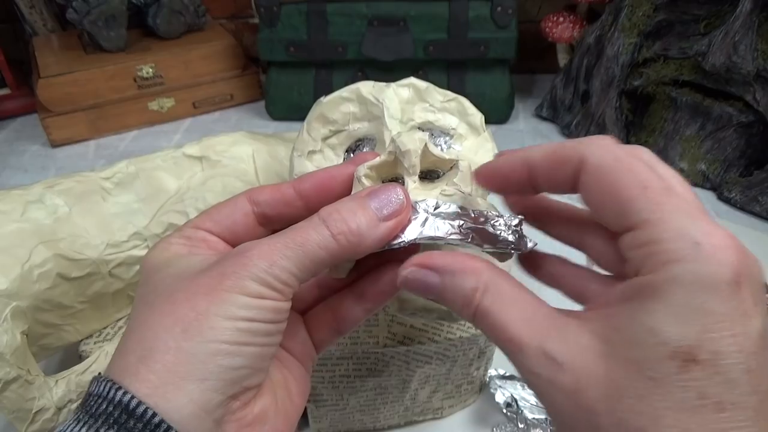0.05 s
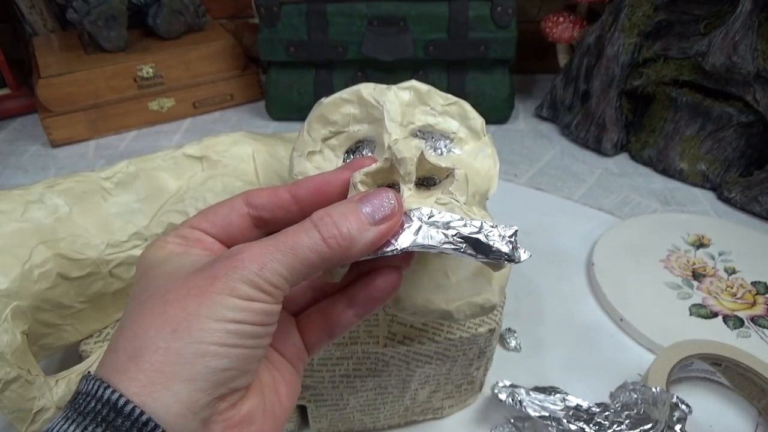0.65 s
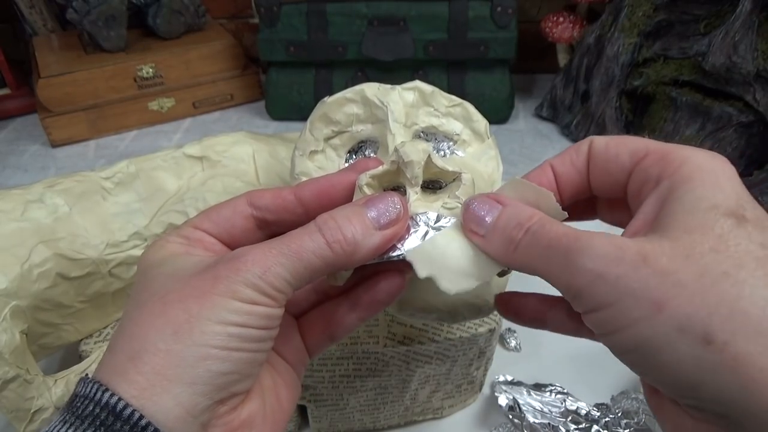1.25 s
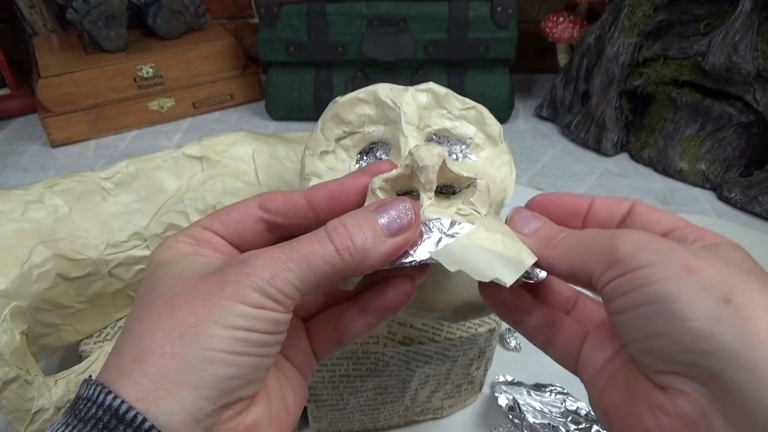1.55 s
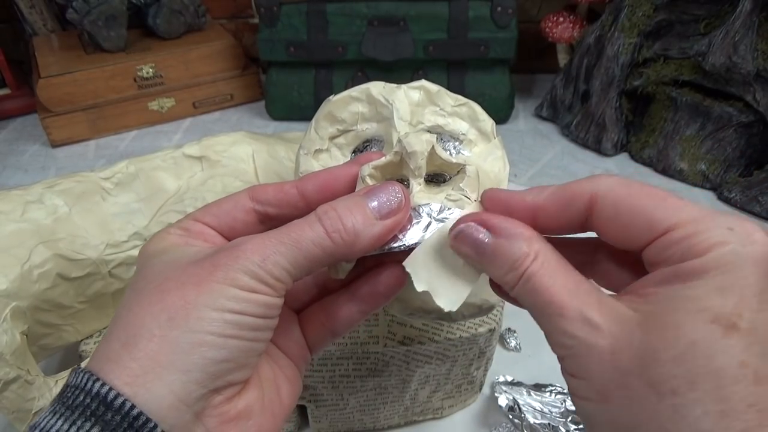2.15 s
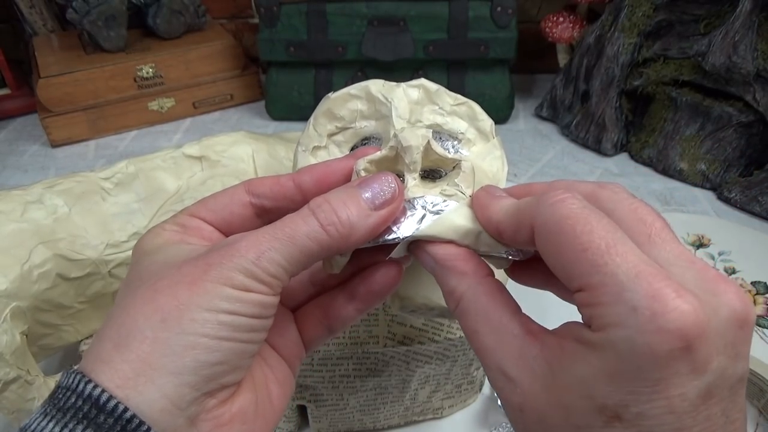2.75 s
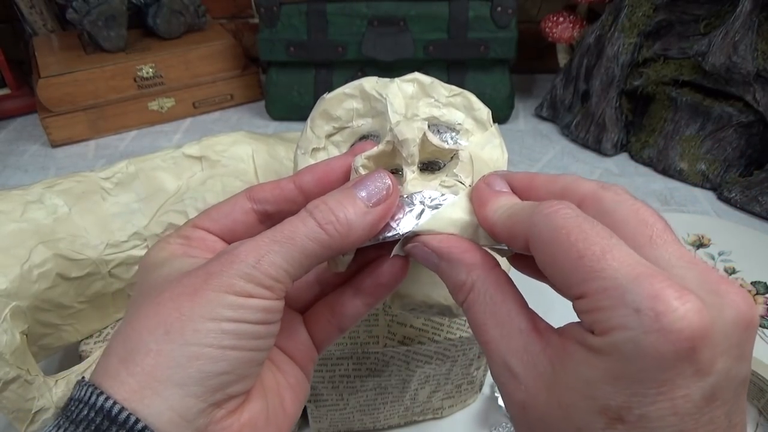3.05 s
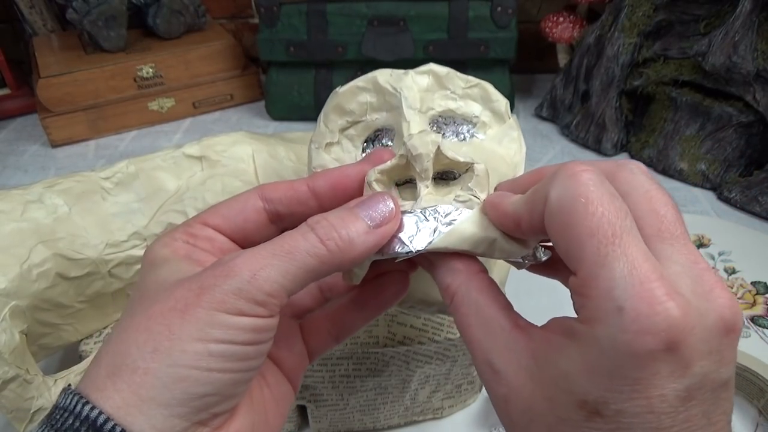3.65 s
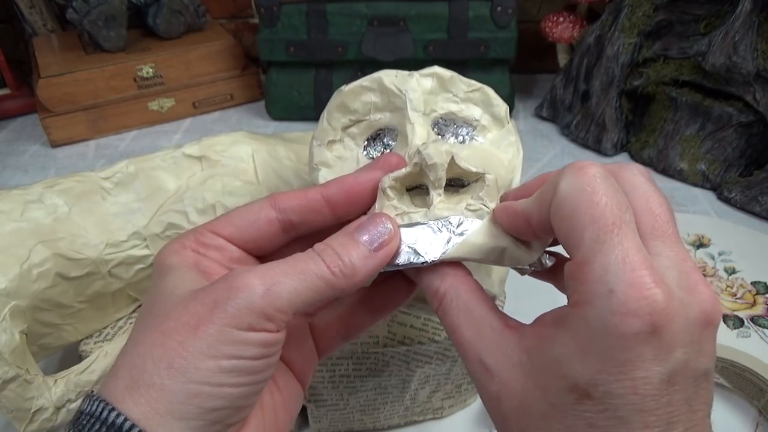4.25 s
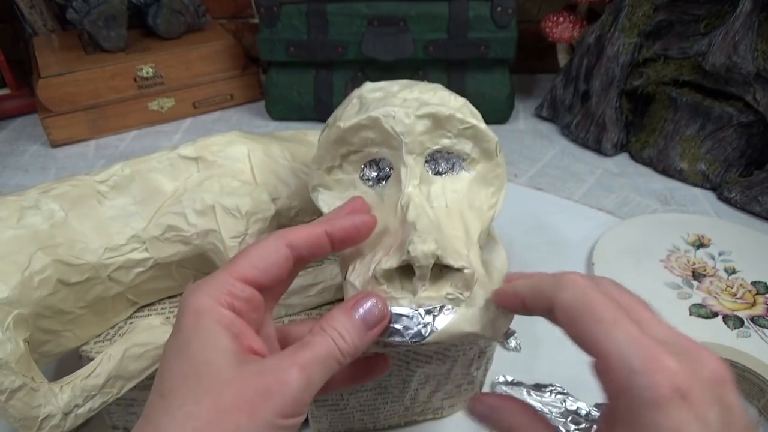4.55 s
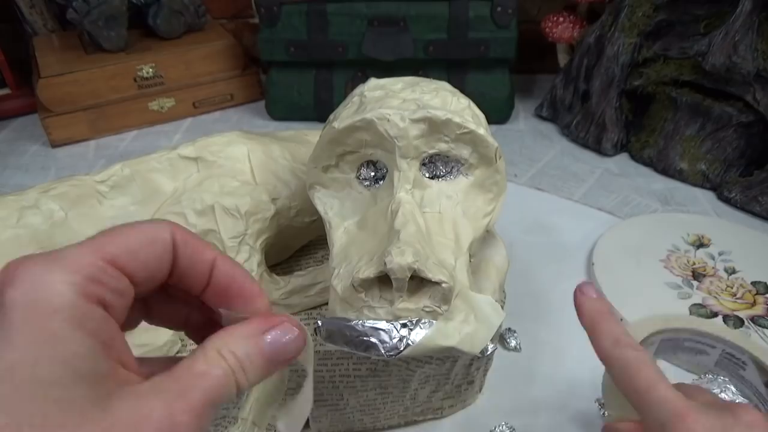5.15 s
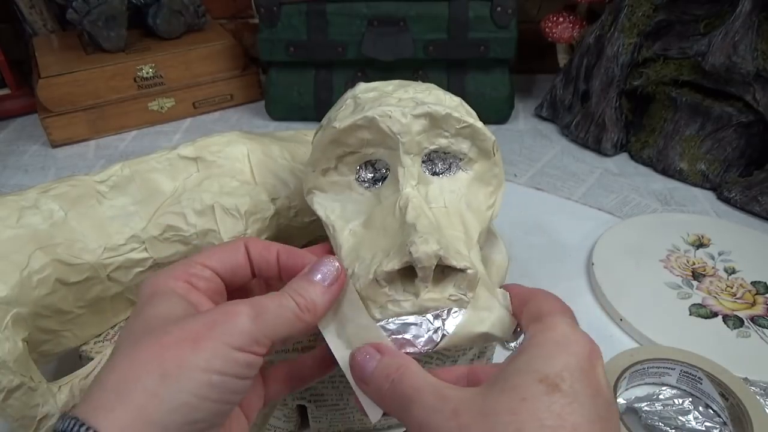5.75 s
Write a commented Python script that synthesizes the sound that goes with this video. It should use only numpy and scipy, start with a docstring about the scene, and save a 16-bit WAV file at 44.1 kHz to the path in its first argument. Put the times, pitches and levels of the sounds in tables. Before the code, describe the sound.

A jerky rip of masking tape, followed by hissing finger rubs and small foil crackles on a paper mask, then quick peeling and a knock.

```python
"""At a craft table in a small room, hands tape a strip of aluminium foil to a papier-mache mask. Masking tape
rips off its roll in jerks as tiny threads of glue let go. Fingers rub it down with a hiss, the foil's creases
buckle and snap, and the hollow mask answers with soft knocks. Near the end the scene changes and everything
runs quicker and brighter, the motor's hum included; more tape is peeled in quick tugs and the roll knocks on
the table. Faint room noise and the hum of a distant motor lie underneath."""
import sys
import numpy as np
from scipy import signal
from scipy.fft import rfft, irfft, next_fast_len
from scipy.io import wavfile
from scipy.ndimage import uniform_filter1d, map_coordinates

SR = 44100
rng = np.random.default_rng(int(sys.argv[2]) if len(sys.argv) > 2 else 0)


def write(x):
    x = np.atleast_2d(x).T
    wavfile.write(sys.argv[1], SR, np.round(np.clip(x, -1, 1) * 32767).astype(np.int16))


N = 265129
AIR_START_S, LATE_S = 0.0436, 4.77  # the background sets in; the late, brighter part begins
CREAK_S = 0.0027  # a crease creaks this long before it snaps

# Tone curves. Each row: frequency in Hz, relative level in dB.
EARLY_AIR_TONE = [(25, -7.5), (70, -16), (130, -12.5), (350, -13.5), (900, -18), (4000, -23),
                  (16000, -31.5)]
LATE_AIR_TONE = [(40, -17), (120, -21), (250, -10), (400, -10.5), (1100, -6), (4000, -14.5), (9800, -15.5),
                 (11000, -13), (12200, -17.5), (16000, -22)]
EARLY_WIDTH = [(40, -22), (200, -11), (700, -1.5), (3000, -3.5), (8000, -26.5)]  # how much of the room noise differs between left and right
LATE_WIDTH = [(200, -20), (800, -13), (3000, -1.5), (8000, -7)]
TABLE_ECHO_TONE = [(150, -8), (500, -9), (2000, -4), (5000, -6.5), (14000, -19)]
MASK_TONE = [(60, -16.5), (130, -9), (270, -1.5), (550, -4), (900, 1), (1500, 1), (2300, -1), (4000, -26.5),
             (9000, -29)]
RUB_TONE = [(400, -42), (1200, -17.5), (1900, -4.5), (3600, -2), (5800, 2.5), (8000, -1), (10500, 2.5),
            (12500, -2), (16000, -7)]
NAIL_TONE = [(1000, -32), (3600, -15), (5300, -1), (6800, -9.5), (9800, -13.5), (16000, -33)]
CREASE_TONE = [(1000, -31), (2500, -13.5), (4500, -6), (7000, 0), (9300, -3), (11500, -4), (15000, -12)]  # for a crease pitched at 7000 Hz
EARLY_DULLING = [(9500, 0), (12000, -5), (15000, -16.5)]  # softens the highest treble
ROLL_TONE = [(200, -22), (600, -8.5), (830, -6), (6000, 4), (12000, 4)]  # the small roll gives off little bass
PEEL_TONE = [(600, -33.5), (2000, -16), (3300, -5.5), (4800, -7), (7000, -2.5), (9000, -1.5), (13000, 1.5),
             (16000, -1)]
RIP_TONE = [(150, -20), (500, -16), (1000, -15.5), (1700, -7), (3000, -3), (4500, -4), (7500, -3),
            (10000, -3.5), (12000, -12), (14500, -27)]

# A distant motor. Each row: frequency in Hz, level in dB.
EARLY_HUM = [(29.6, -70), (40.2, -75)]
LATE_HUM = [(119.5, -69.5), (160.5, -77)]
# The room's echo. Each row: frequency in Hz, seconds to fade by 60 dB.
ROOM_FADE = [(200, 0.41), (2000, 0.14), (8000, 0.1), (16000, 0.25)]
# How things ring. Each row: frequency in Hz, width in Hz, relative level in dB.
HOLLOW_RING = [(239, 31, -3), (279.5, 32, 6.5), (425, 59, -11)]  # the hollow roll and mask
TAPE_RING = [(3050, 270, -23), (6560, 300, -12), (7470, 770, 11.5), (8400, 300, 4), (9170, 400, 6)]  # the tight strip of tape
# The knocked roll's notes. Each row: frequency in Hz, relative level in dB, seconds to fade by 60 dB.
ROLL_NOTES = [(855, -7, 0.046), (1005, -32, .03), (1065, -1, 0.026), (1340, -2.5, 0.03),
              (1643, -6.5, 0.044), (2020, -6.5, 0.024), (2630, -5.5, 0.033), (2980, 0.5, 0.03),
              (3500, -4.5, 0.02), (4075, 1, 0.017), (5030, 2, 0.0059)]

# Short events. Each row: start in seconds, relative level in dB.
HOLLOW_BUMPS = [(0.604, -42), (.765, -33.5), (.844, -42), (.885, -43), (0.948, -48.5), (3.457, -48.5),
                (3.764, -42)]
FINGER_TAPS = [(0.0489, -48), (0.0811, -37.5), (1.431, -31), (1.587, -39.5), (1.9227, -48), (2.3424, -41.5),
               (2.351, -40.5), (2.5052, -42), (2.7191, -39), (2.785, -44), (3.079, -46), (3.3404, -35.5),
               (3.3613, -40), (3.5187, -38), (4.0129, -49.5), (4.0888, -38.5), (4.2699, -41.5),
               (4.391, -34.5), (4.5325, -36.5), (5.1295, -33.5)]
TAPE_JERKS = [(0.617, -17.5), (0.6347, -16.5), (0.6685, -17), (0.6817, -18), (0.7216, -22), (0.752, -14),
              (0.7642, -12.5), (0.825, -10), (0.884, -15), (0.892, -13), (0.94, -17.5), (0.9632, -20),
              (0.9915, -15), (1.0328, -22.5), (1.063, -19), (1.1222, -20.5), (1.1495, -17), (1.1703, -22.5)]
# Sliding moves. Each row: start and length in seconds, relative levels of hiss and mask scrape in dB.
FINGER_RUBS = [(0.05, 0.055, -52.5, -56), (1.18, 0.1, -45.5, -58), (1.318, 0.021, -45, -57),
               (1.375, 0.047, -42.5, -69), (1.41, 0.032, -30, -40.5), (1.49, 0.061, -32, -46),
               (1.545, 0.057, -29.5, -40), (1.6, 0.045, -49.5, -41.5), (1.735, 0.046, -49, -55.5),
               (1.92, 0.033, -45.5, -50.5), (2.108, 0.061, -39.5, -72), (2.16, 0.076, -41, -66),
               (2.225, 0.095, -34, -54), (2.34, .15, -50.5, -51.5), (2.765, .095, -49.5, -58.5),
               (2.945, 0.14, -52, -51), (3.115, .065, -43, -62), (3.215, 0.095, -43, -44.5),
               (3.32, 0.052, -35, -37), (3.435, 0.069, -42, -51), (3.48, .17, -47.5, -45),
               (3.66, 0.13, -51, -60), (3.762, 0.098, -44.5, -50), (3.87, 0.079, -58, -47.5),
               (4.088, 0.055, -42, -51), (4.297, 0.048, -48, -55.5), (4.386, 0.15, -44.5, -42),
               (4.5, 0.091, -39.5, -44.5), (4.58, 0.1, -42, -48.5), (4.695, 0.066, -43.5, -50),
               (5.042, 0.021, -31, -54), (5.58, 0.044, -62, -62), (5.722, 0.03, -50, -56),
               (5.77, 0.052, -49, -59.5)]
NAIL_SKID = [(2.543, .057, -34, -54.5)]
TAPE_TUGS = [(4.793, 0.024, -33, -47), (4.831, 0.021, -23, -57), (4.896, 0.038, -31.5, -49.5),
             (5.036, .024, -26, -59), (5.126, 0.0068, -33, -45), (5.17, 0.0094, -42.5, -68),
             (5.201, 0.052, -25, -54), (5.25, 0.033, -47.5, -54), (5.325, 0.02, -37.5, -50.5),
             (5.374, 0.015, -39, -55)]
# Spells of kneading the foil. Each row: start and length in seconds, top relative level in dB.
KNEADING_SPELLS = [(2.296, .13, -42.5), (3.21, .17, -51), (3.489, .27, -37), (3.922, .44, -45.5),
                   (4.44, .16, -42), (4.948, .08, -46.5)]
# The loudest creases. Each row: time in seconds, relative level in dB, pitch in Hz.
FOIL_SNAPS = [(0.0487, -29.5, 6130), (0.5971, -28, 7350), (0.884, -28, 8300), (0.9917, -24, 7550),
              (1.304, -34, 6750), (1.3598, -32, 7900), (1.3875, -27.5, 5700), (1.4325, -22.5, 6600),
              (1.494, -31, 8300), (1.571, -20.5, 8900), (1.6164, -32.5, 7240), (1.9227, -33, 6900),
              (1.9467, -40.5, 8400), (2.3861, -26, 9400), (2.4063, -36.5, 6300), (2.5155, -35, 7900),
              (2.5427, -36, 7500), (2.753, -27.5, 7200), (2.7853, -31, 5000), (2.8207, -35.5, 6100),
              (3.2768, -32.5, 5700), (3.3085, -35, 5650), (3.3406, -31, 6500), (3.5186, -34, 7050),
              (3.5388, -34, 6350), (3.5979, -26.5, 8500), (3.604, -30, 7300), (3.6733, -28.5, 6800),
              (3.689, -27, 10000), (3.746, -32.5, 7900), (3.9235, -41, 6240), (4.0129, -27.5, 4860),
              (4.035, -34.5, 5500), (4.0884, -37, 4770), (4.6812, -36, 8850), (4.8965, -35, 11400),
              (4.9082, -36, 10500), (5.1288, -31.5, 7600), (5.133, -31.5, 7460), (5.346, -30.5, 7200),
              (5.3844, -35, 7500), (5.8112, -34.5, 11300), (5.8374, -34.5, 7500)]
# The roll hits the table. Each row: start in seconds, relative level in dB, treble cutoff in Hz.
ROLL_KNOCKS = [(4.773, -41.5, 1600), (4.7937, -35, 1620), (5.2292, -16.5, 8000), (5.2414, -20.5, 7000),
               (5.259, -47, 1400), (5.268, -44.5, 1400)]
# The steady pull under the jerks. Each row: time in seconds, relative level in dB.
TAPE_PULL = [(0.549, -44.5), (.6, -50), (.63, -38), (.78, -36), (.82, -39.5), (.868, -50), (.885, -33),
             (.925, -47), (.98, -39), (1.1, -42.5), (1.199, -50)]


def amp(db):
    """Turn decibels into a gain."""
    return 10 ** (np.asarray(db) / 20)


def unit(x):
    """Scale x to an average (rms) level of 1."""
    return x / np.sqrt(np.mean(x ** 2) + 1e-20)


def unit_hit(x):
    """Scale x so that its first 4 ms have an average (rms) level of 1."""
    return x / np.sqrt(np.mean(x[:SR // 250] ** 2) + 1e-20)


def clock(seconds):
    """The time of each sample in a stretch this long."""
    return np.arange(int(seconds * SR)) / SR


def fade(t, seconds):
    """A gain that falls by 60 dB in the given time."""
    return amp(-60 * t / seconds)


def read_curve(points, hz):
    """Read between (Hz, value) points on a logarithmic frequency scale."""
    freqs, values = np.transpose(points)
    return np.interp(np.log(hz + 1), np.log(freqs), values)


def add(track, start, x):
    """Mix x into the track from start seconds on."""
    part = track[max(round(start * SR), 0):][:len(x)]
    part += x[:len(part)]


def wobble(n, rate):
    """A smooth curve through rate random points a second."""
    return map_coordinates(rng.standard_normal(int(n * rate / SR) + 4), [np.arange(n) * rate / SR])


def colour(x, tone, shift=1, ripple_db=0, ripple_hz=330):
    """Filter x by a tone curve; shift multiplies its frequencies, ripple adds chance peaks and dips."""
    size = 2 * next_fast_len(len(x))
    hz = np.fft.rfftfreq(size, 1 / SR)
    ripple = map_coordinates(rng.standard_normal(400), [hz / ripple_hz], mode="mirror")
    gain = amp(read_curve(tone, hz / shift) + ripple_db * ripple)
    # Folding the cepstrum makes the filter ring only after a sound, never before it.
    cepstrum = irfft(np.log(gain))
    cepstrum[1:size // 2] *= 2
    cepstrum[size // 2 + 1:] = 0
    return irfft(rfft(x, size) * np.exp(rfft(cepstrum)), size)[:len(x)]


def resonate(x, rings):
    """Let x ring at each (Hz, width, dB) row."""
    f = np.fft.rfftfreq(2 * len(x), 1 / SR)
    response = sum(amp(db) * 1j * f * width / (hz * hz - f * f + 1j * f * width)
                   for hz, width, db in rings)
    return irfft(rfft(x, 2 * len(x)) * response)[:len(x)]


def slips(n, rate, spread_db):
    """Tiny random clicks of many sizes, about rate a second."""
    sizes = amp(spread_db * np.clip(rng.standard_normal(n), -2.5, 2.5))
    return (rng.random(n) < rate / SR) * rng.choice([-1, 1], n) * sizes


def background(tone, air_db, width, motor):
    """Faint room noise, nearly alike on both sides in the bass, and a motor's hum."""
    t = np.arange(N) / SR
    middle, side = (unit(colour(rng.standard_normal(N), tone)) for _ in range(2))
    side = colour(side, width)
    hum = sum(np.sqrt(2) * amp(db) * np.sin(2 * np.pi * (hz * t + rng.random())) for hz, db in motor)
    return amp(air_db) * (middle + np.array([side, -side])) + hum


def room_echo(x):
    """A small furnished room gives left and right each their own short echo."""
    hz, t, noise = signal.stft(rng.standard_normal((2, SR // 3)), SR, nperseg=256)
    tail = signal.istft(noise * fade(t, read_curve(ROOM_FADE, hz)[:, None]), SR, nperseg=256)[1]
    delayed = np.pad(x, (SR // 300, 0))
    return signal.fftconvolve(delayed[None], tail / np.linalg.norm(tail[0]), axes=1)[:, :N]


def table_echo(x):
    """Sound bounces off the table top and arrives from the side."""
    side = np.zeros(N)
    add(side, start=0.0013, x=amp(-24) * colour(x, TABLE_ECHO_TONE))
    return np.array([side, -side])


def near_reflections(x, ripple_db):
    """Reflections from hands and table give left and right slightly different tones."""
    flat = [(1, 0.012)]
    return np.array([colour(x, flat, ripple_db=ripple_db, ripple_hz=442) for _ in range(2)])


def hollow_bumps():
    """Bumped cardboard and paper give a soft boom that dies quickly."""
    out, t = np.zeros(N), clock(0.15)
    for start, db in HOLLOW_BUMPS:
        rise = 1 - np.exp(-t / 0.0064)
        shove = fade(t, 0.036) * rise * rng.standard_normal(len(t))
        soft_shove = colour(shove, [(100, -19), (220, 1), (350, 0.5), (900, -15.5)])
        add(out, start, amp(db - 13.5) * unit(resonate(soft_shove, HOLLOW_RING)))
    return out


def mask_knock(start):
    """The mask answers a blow with a short, woody burst, pitched higher in the late part."""
    t = clock(0.06)
    burst = fade(t, 0.025) * rng.standard_normal(len(t))
    return unit_hit(colour(burst, MASK_TONE, shift=1.1 if start < LATE_S else 2))


def finger_taps():
    """A fingertip knocks the mask and jolts the foil into a dull tick."""
    out = np.zeros(N)
    for start, db in FINGER_TAPS:
        add(out, start, amp(db) * mask_knock(start))
        add(out, start - CREAK_S, amp(db - 3.5) * crease(hz=4350))
    return out


def strokes(moves, tone, hiss_shift, octaves_per_db, peak_at, mask_shift,
            hiss_db, scrape_db, swell_db, spread_db, ripple_db, release_s):
    """Friction swells and fades: fine slips hiss while coarser ones sound the hollow mask."""
    out = np.zeros(N)
    for start, length, db, mask_db in moves:
        t = start - 0.004 + clock(length + 0.052)
        n, end = len(t), start + length
        off_peak = np.interp(t, [start, start + peak_at * length, end], [1, 0, 1])
        contact_db = np.interp(t, [t[0], start, end, end + release_s], [-33, -0.5, -2, -34])
        force = amp(contact_db - swell_db * off_peak ** 1.38 + 2.7 * wobble(n, rate=227.6))
        shift = hiss_shift * 2 ** (octaves_per_db * (db + 34))  # slower, quieter strokes can be duller
        fine = slips(n, rate=14000, spread_db=spread_db)
        hiss = unit(colour(fine, tone, shift, ripple_db))
        coarse = slips(n, rate=2500, spread_db=3.5)
        scrape = unit(colour(coarse, MASK_TONE, mask_shift, ripple_db=2.8, ripple_hz=141.8))
        add(out, t[0], force * (amp(db + hiss_db) * hiss + amp(mask_db + scrape_db) * scrape))
    return out


def crinkles(rubbing, rate, tick_db, scatter_db):
    """Tiny wrinkles give way at random under the fingers, louder as the rubbing grows."""
    out, t = np.zeros(N), clock(0.012)
    pressure = np.abs(uniform_filter1d(rubbing ** 2, size=2000)) ** 0.25
    for when, size, pitch in rng.random((int(rate * N / SR), 3)):
        burst = fade(t, 0.0063) * rng.standard_normal(len(t))
        tick = unit_hit(colour(burst, CREASE_TONE, shift=0.7 + 0.5 * pitch))
        gain = pressure[int(when * N)] * amp(tick_db + scatter_db * size ** 2)
        add(out, when * N / SR, gain * tick)
    return out


def crease(hz):
    """A patch of foil creaks, flips and takes its neighbour along; the sheet shivers after them."""
    t = clock(0.06) - CREAK_S

    def pulse(delay, seconds):
        return (t >= delay) * fade(np.abs(t - delay), seconds)

    creak = (t < 0) * amp(-18.5 - 10.5 * np.abs(t) / CREAK_S)
    gap_s = 0.0012 * (0.5 + rng.random())
    flips = pulse(0, 0.0019) + amp(-3) * pulse(gap_s, 0.0015)
    shiver = amp(-35) * pulse(0, 0.015) + amp(-23.5) * pulse(0, 0.06)
    burst = (creak + flips + shiver) * rng.standard_normal(len(t))
    snap = colour(burst, CREASE_TONE, shift=hz / 7000, ripple_db=1)
    attack = snap[(t >= 0) & (t < 0.004)]
    return snap / np.sqrt(np.mean(attack ** 2))


def foil_snaps(creases):
    """Each crease snaps and faintly knocks the mask below."""
    out = np.zeros(N)
    for start, db, hz in creases:
        add(out, start - CREAK_S, amp(db) * crease(hz))
        add(out, start, amp(db - 27.5) * mask_knock(start))
    return out


def kneading(rate, range_db, hz, spread_octaves):
    """Small creases pop at uneven moments while the foil is kneaded."""
    creases = []
    for start, length, db in KNEADING_SPELLS:
        for k, (lag, size, pitch) in enumerate(rng.random((int(length * rate), 3))):
            pop_hz = hz * 2 ** (spread_octaves * (pitch - 0.5))
            creases.append((start + (k + lag) / rate, db - range_db * size, pop_hz))
    return foil_snaps(creases)


def roll_knocks():
    """The stiff roll hits the table and rings briefly; a softer hit leaves out its high notes."""
    out, t = np.zeros(N), clock(0.1)
    for start, db, cutoff_hz in ROLL_KNOCKS:
        ring = np.zeros(len(t))
        for hz, note_db, fade_s in ROLL_NOTES:
            gain = rng.choice([-1, 1]) * amp(note_db + rng.normal(0, 1.6)) / (1 + (hz / cutoff_hz) ** 4)
            detuned_hz = hz * np.exp(rng.normal(0, 0.021))
            ring += gain * fade(t, fade_s) * np.sin(2 * np.pi * detuned_hz * t)
        add(out, start, amp(db - 3) * unit_hit(colour(ring, ROLL_TONE)))
    return out


def glue_threads(n, ring_db, ripple_db):
    """A shower of glue threads lets go, and the tight strip of tape rings with them."""
    threads = unit(slips(n, rate=6000, spread_db=5))
    ring = amp(ring_db) * unit(resonate(threads, TAPE_RING))
    return unit(colour(threads + ring, RIP_TONE, ripple_db=ripple_db))


def tape_rip():
    """Tape comes off the roll in a steady pull, with short jerks on top that ring and die away."""
    times, levels = np.transpose(TAPE_PULL)
    pull_db = np.interp(np.arange(N) / SR, times, levels, left=-150, right=-150)
    out = amp(pull_db + 2.2 * wobble(N, rate=200)) * glue_threads(N, ring_db=-9.5, ripple_db=0.5)
    t = clock(0.12)
    fall = fade(np.maximum(t - 0.005, 0), 0.08)  # holds for 5 ms first
    for start, db in TAPE_JERKS:
        add(out, start, amp(db - 13.5) * fall * glue_threads(len(t), ring_db=-5, ripple_db=4))
    return out


def scene():
    """Mix the close sounds of fingers, foil and tape with their echoes and the background."""
    t = np.arange(N) / SR
    early = t < LATE_S
    rubbing = strokes(FINGER_RUBS, RUB_TONE, hiss_shift=1, octaves_per_db=0.03, peak_at=0.53,
                      mask_shift=1, hiss_db=-0.5, scrape_db=-1.5, swell_db=8,
                      spread_db=5.5, ripple_db=2, release_s=0.034)
    nail = strokes(NAIL_SKID, NAIL_TONE, hiss_shift=0.98, octaves_per_db=0, peak_at=0.6,
                   mask_shift=1, hiss_db=2, scrape_db=-0.5, swell_db=10.5,
                   spread_db=2.5, ripple_db=2, release_s=0.012)
    peeling = strokes(TAPE_TUGS, PEEL_TONE, hiss_shift=0.95, octaves_per_db=0.15, peak_at=0.5,
                      mask_shift=0.96, hiss_db=0.5, scrape_db=-1.5, swell_db=11.5,
                      spread_db=3, ripple_db=3, release_s=0.033)
    popping = kneading(rate=48, range_db=13, hz=6300, spread_octaves=0.4)
    foil = foil_snaps(FOIL_SNAPS) + finger_taps() + popping
    foil += crinkles(rubbing, rate=51, tick_db=-33.5, scatter_db=15.5)
    foil, rubbing = (np.where(early, colour(x, EARLY_DULLING), x) for x in (foil, rubbing))
    centre = rubbing + nail + foil + hollow_bumps()
    ripping, roll = tape_rip(), roll_knocks()

    direct = near_reflections(centre, ripple_db=0.57)
    direct += near_reflections(ripping, ripple_db=0.5) * amp([[-0.5], [0.5]])
    direct += peeling * amp([[-1], [1]])  # like the rip, a little to the right
    direct += near_reflections(roll, ripple_db=1)
    early_air = background(EARLY_AIR_TONE, -59.5, EARLY_WIDTH, EARLY_HUM) * (t > AIR_START_S)
    late_air = background(LATE_AIR_TONE, -61.5, LATE_WIDTH, LATE_HUM)
    echoes = table_echo(foil + ripping + roll) + amp(-23) * room_echo(centre + ripping + peeling + roll)
    return direct + echoes + np.where(early, early_air, late_air)


def record(dry):
    """Cut away everything above 15900 Hz."""
    size = next_fast_len(N + SR // 2)
    in_band = np.fft.rfftfreq(size, 1 / SR) < 15900
    return irfft(rfft(dry, size) * in_band, size)[:, :N]


dry = scene()
out = record(dry)
write(out)
```